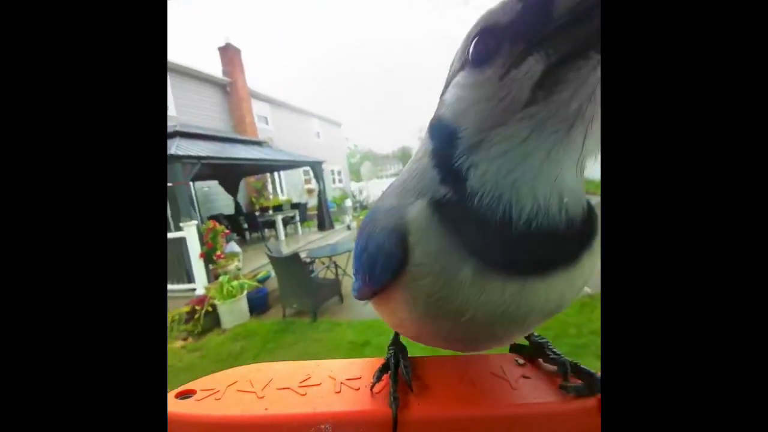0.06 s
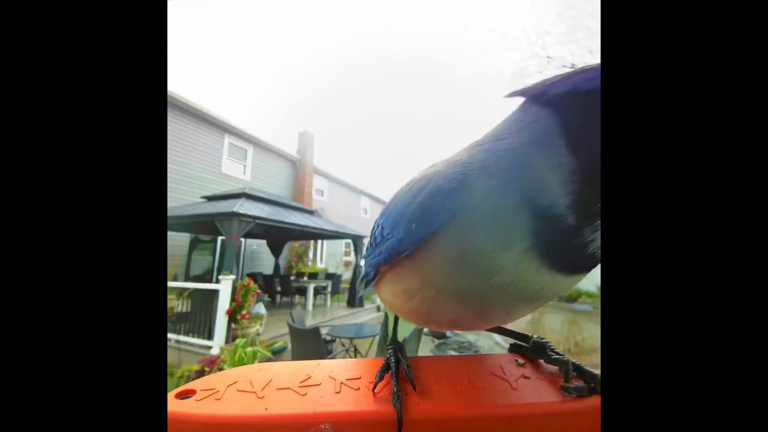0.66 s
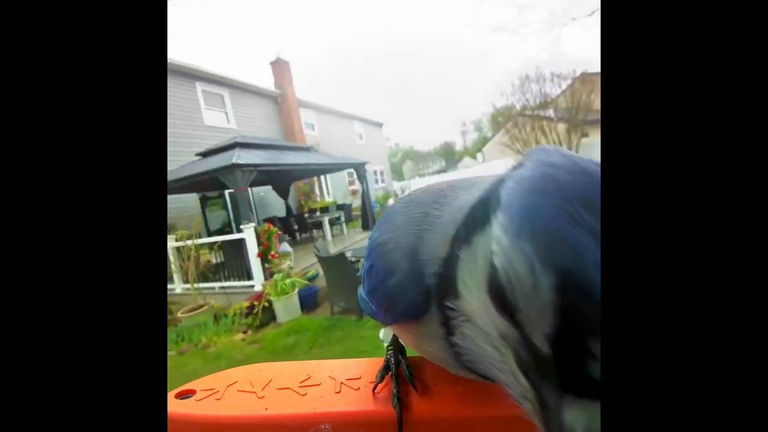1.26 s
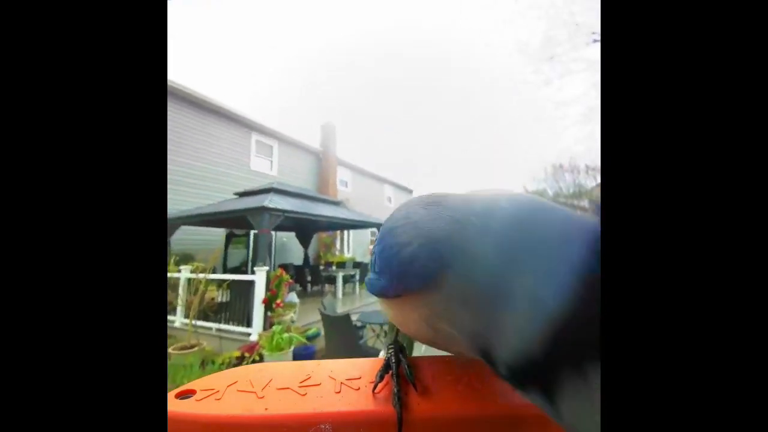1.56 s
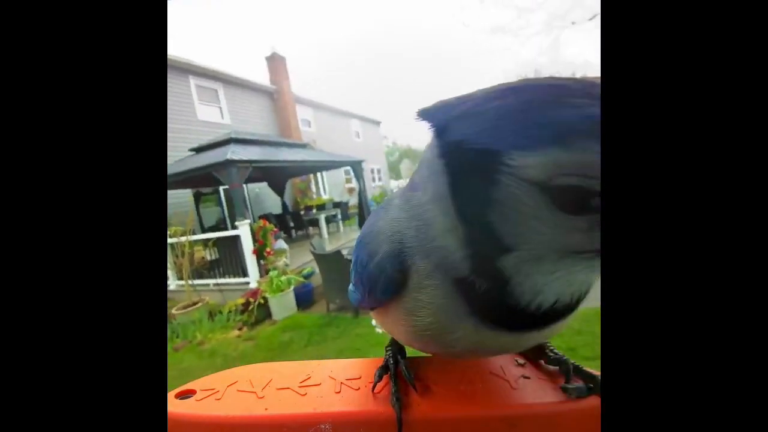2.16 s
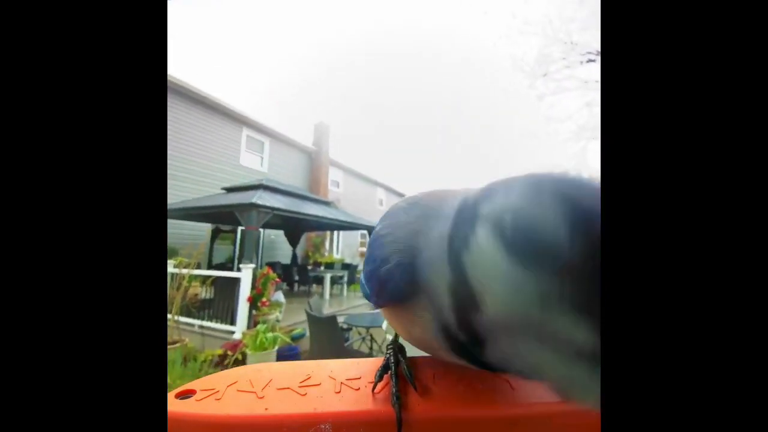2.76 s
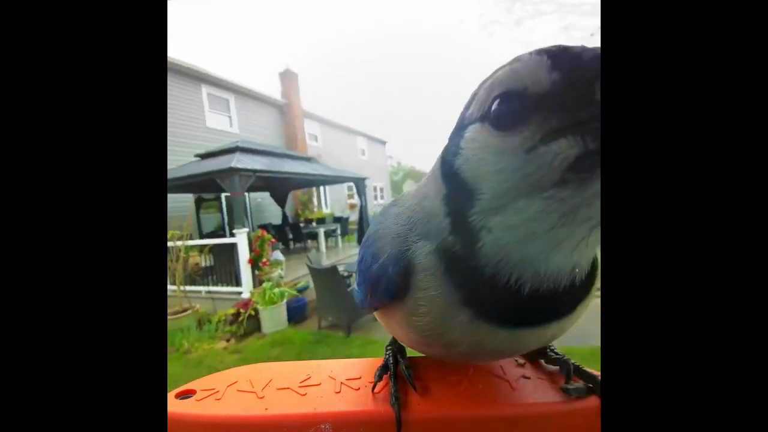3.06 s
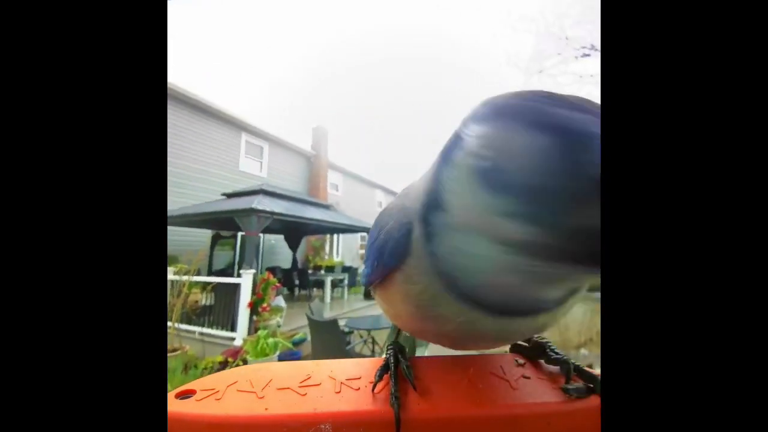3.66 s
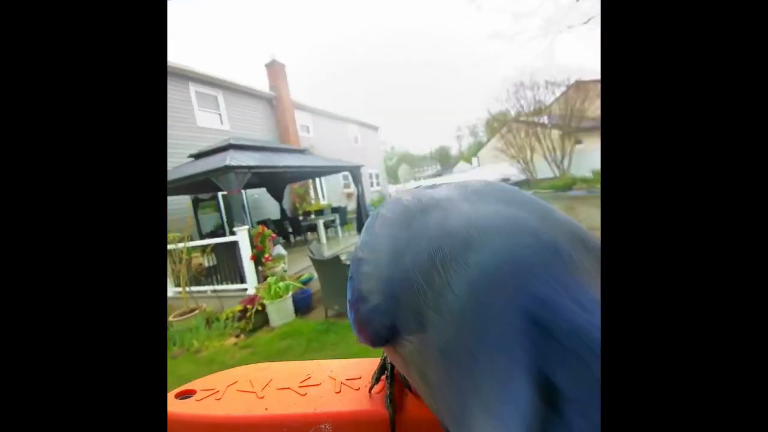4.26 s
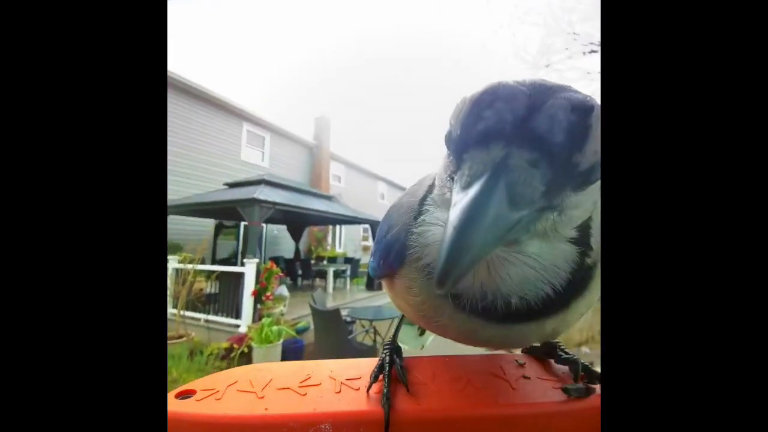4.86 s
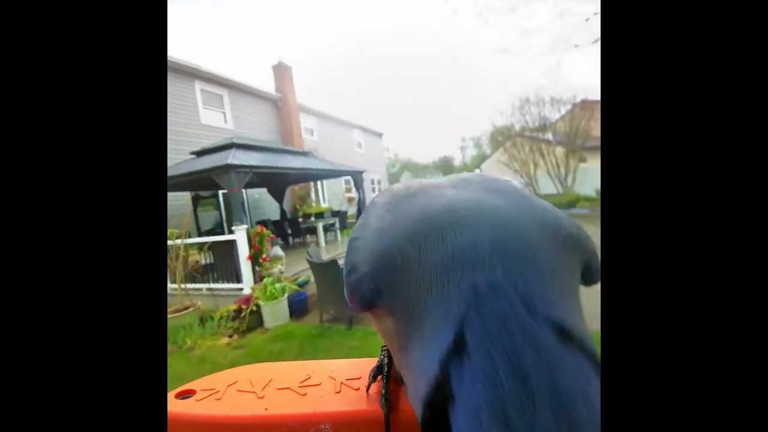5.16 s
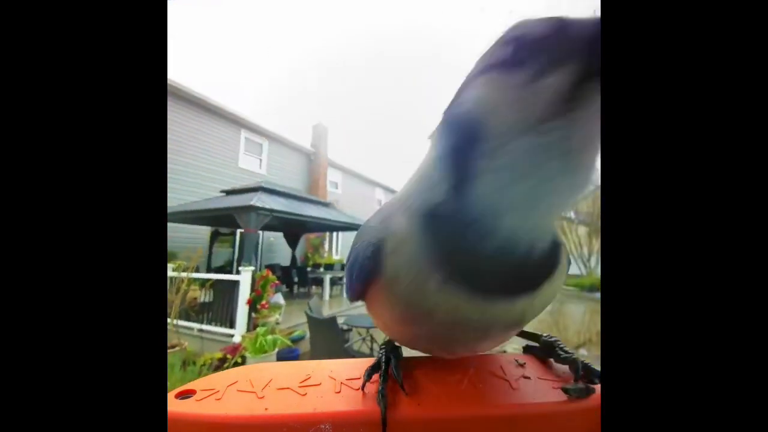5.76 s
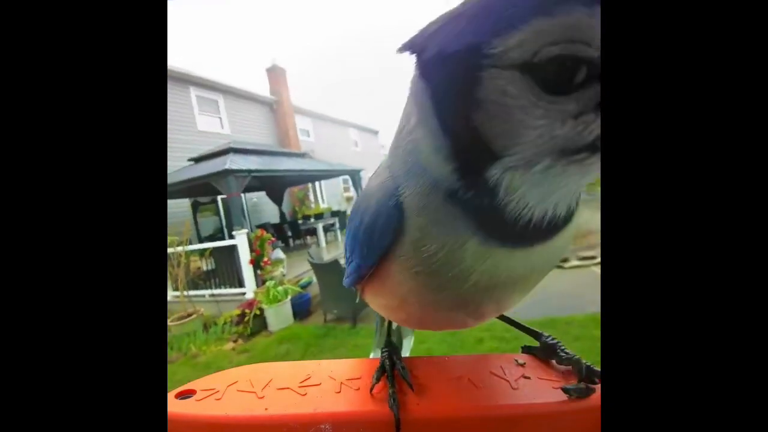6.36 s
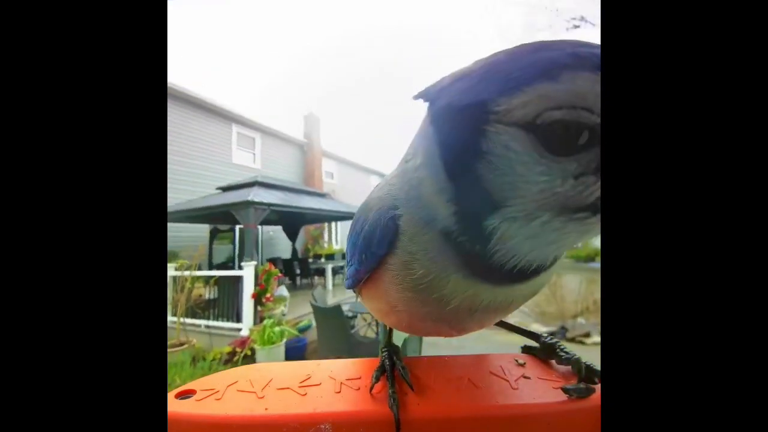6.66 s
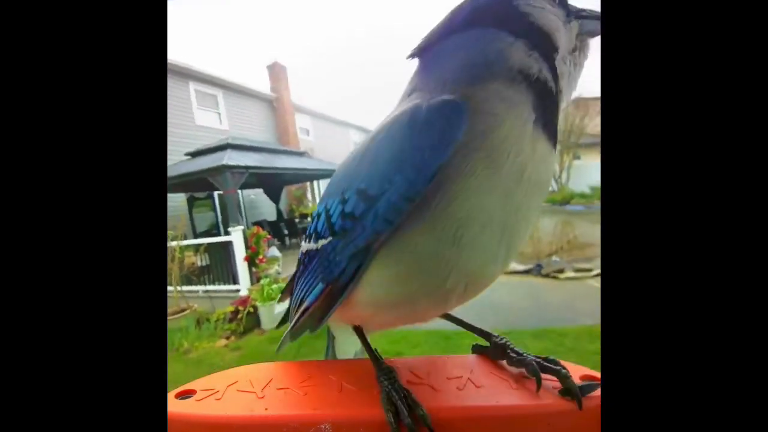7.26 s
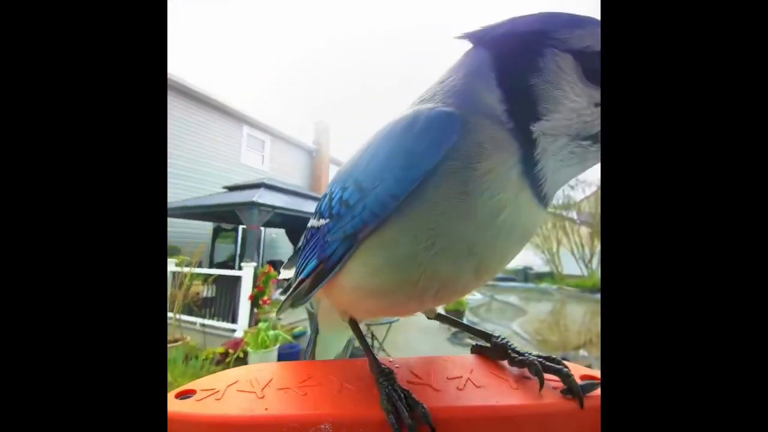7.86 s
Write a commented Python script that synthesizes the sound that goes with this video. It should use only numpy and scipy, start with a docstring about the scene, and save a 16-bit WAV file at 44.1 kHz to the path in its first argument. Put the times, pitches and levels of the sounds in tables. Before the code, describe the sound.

A small bird chatters harshly, then a jay's beak clicks and knocks on a hollow plastic feeder, very close, over soft outdoor hiss.

```python
"""A jay stands on a plastic feeder, right by its built-in microphone, whose port rings near 5 kHz.
For the first 0.7 s a small bird nearby scolds in a harsh, fast chatter, with a soft hissy wash under it.
Then the jay picks at the seed: its beak clicks, its pecks knock the hollow case, its claws scuff
and it hops once. Throughout, the yard echoes faintly and a thin hum swells and fades over soft hiss."""
import sys
import numpy as np
from scipy import signal
from scipy.fft import rfft, irfft
from scipy.io import wavfile
from scipy.ndimage import uniform_filter1d

SR = 44100
rng = np.random.default_rng(int(sys.argv[2]) if len(sys.argv) > 2 else 0)


def wav_record(signal):
    """Record a signal, one row per channel, as 16-bit PCM in the file named by sys.argv[1]."""
    frames = np.transpose(np.atleast_2d(signal))
    bounded = np.clip(frames, -1, 1)
    # unit amplitude maps onto the largest positive 16-bit level
    quanta = np.round(bounded * 32767).astype(np.int16)
    wavfile.write(sys.argv[1], SR, quanta)


N = 357651
TIME_S = np.arange(N) / SR
AGE_S = TIME_S[:int(.4 * SR)]  # time within one event
LIGHT_THUD_DB = -50

# chatter notes (time [s], top of pitch arch [Hz], second harmonic [dB], length [s])
NOTES = [(-0.012, 2370, -40, 0.025), (0.029, 2053, -37.5, 0.028), (0.075, 2204, -42, 0.033),
         (0.128, 2736, -33.5, 0.026), (0.179, 2660, -30, .024), (0.231, 2800, -28, .022),
         (0.281, 2670, -25.5, .024), (0.334, 2710, -27, .027), (0.395, 2606, -39.5, 0.03),
         (0.46, 2847, -39.5, .024), (0.52, 3100, -37, .026), (0.574, 2803, -32, 0.027),
         (0.624, 3100, -34.5, 0.032), (0.679, 3057, -35.5, 0.029)]
# rasp around the second harmonic (frequency [Hz], gain [dB])
RASP_HIGH = [(1000, -62), (3300, -36), (3900, -24.5), (4500, -11.5), (4850, -5.5), (5150, 4), (5500, -12.5),
             (5900, -19), (6800, -32.5), (10000, -48.5), (16000, -62.5)]
# rasp around the fundamental (frequency [Hz], gain [dB])
RASP_LOW = [(100, -23), (800, -15.5), (1550, -30), (1950, -10), (2500, -4.5), (3150, -11), (3600, -2.5),
            (5000, -8), (9000, -29)]
# broad hiss over the notes (frequency [Hz], gain [dB])
RASP_AIR = [(60, -13), (320, 4.5), (700, -7.5), (1000, 7.5), (1500, -13), (7000, -2), (10000, 3),
            (13000, -12), (16000, -25)]
# microphone port response (frequency [Hz], gain [dB])
PORT = [(1000, -52.5), (2200, -38.5), (3600, -29), (4400, -16), (4850, -5.5), (5150, -2.5), (5450, -3.5),
        (5900, -16.5), (6800, -30.5), (10000, -30), (16000, -42)]
# gritty noises (time [s], length [s], rumble [dB], hardness = hiss re rumble [dB])
# row at 0.05 s: soft hissy wash under the chatter; others: scuffs on the plastic
WASH_AND_SCUFFS = [(0.0, 0.028, -46.5, -6.5), (0.05, 0.44, -64.5, 11), (4.27, 0.1, -56, -18),
                   (4.33, 0.49, -68.5, -9), (5.158, 0.047, -47, -10), (5.728, 0.21, -60, -22),
                   (5.92, 0.21, -66, -17), (7.081, 0.056, -51, -13.5), (7.129, 0.125, -50, -4),
                   (7.24, 0.21, -63.5, -11), (7.76, 0.45, -74, -19.5)]
# hollow plastic case (frequency [Hz], gain [dB], t60 [s])
CASE_MODES = [(72, -40, 0.27), (95, -36.5, 0.12), (166, -27.5, 0.22), (194.6, -26.5, .24),
              (275.6, -20.5, 0.12), (300.5, -39, .07), (406, -19.5, 0.16), (483.7, -3.5, 0.099),
              (514.9, 3, 0.048), (567.3, -1.5, 0.045), (625.7, -10.5, 0.075), (706, -12, 0.061),
              (789, -12.5, 0.042), (844, -9.5, 0.034), (980.4, -22, 0.025), (1262, -24, 0.067),
              (1474, -11.5, 0.021), (1594, -14.5, 0.069), (1680, -10, .035), (1857, -8.5, 0.031),
              (2070, -15, 0.012), (2573, -10, 0.038), (2710, -20.5, 0.024), (2944, -12, 0.02),
              (4050, -23, 0.011)]
# beak at seed and tray (time [s], first click [dB], catches [count])
NIBBLES = [(0.167, -29.5, 2), (1.048, -39, 2), (1.561, -35.5, 2), (1.641, -43.5, 1), (1.796, -35, 2),
           (1.892, -38, 4), (2.633, -34.5, 1), (2.7635, -29, 2), (2.885, -32.5, 3), (4.457, -42.5, 2),
           (4.619, -35.5, 2), (5.195, -35, 1), (5.417, -35, 1), (5.433, -34.5, 1), (5.614, -35, 2),
           (6.0117, -46, 1), (7.2338, -27, 1), (7.3126, -41, 1), (7.336, -42, 1)]
# dull part of a click (frequency [Hz], gain [dB])
DULL = [(100, -32), (700, -20), (1500, -20.5), (2000, -9.5), (2600, -7.5), (3150, -4.5), (3700, -7.5),
        (5000, -20.5), (9000, -39.5)]
# bright edge of a contact (frequency [Hz], gain [dB])
EDGE = [(1000, -40), (4000, 11), (7000, -12), (15000, 18)]
# beak and foot blows (time [s], thud [dB], hardness = snap re thud [dB], tray gain [dB])
KNOCKS = [(1.052, -61, 2, -60), (1.566, -52.5, -5, -63), (2.623, -48.5, -10, -50.5),
          (3.168, -69, -11, -87.5), (3.77, -58, -9.5, -72), (4.284, -47.5, -27.5, -84),
          (4.303, -46, -11.5, -61), (5.173, -26, -18, -59), (5.424, -31.5, -6.5, -57),
          (5.756, -55.5, -13, -65.5), (5.835, -51, -12.5, -72), (5.853, -51, -16, -85),
          (7.145, -30, -8.5, -51), (7.215, -29, -23, -57), (7.316, -51, 2, -64), (7.349, -50, -24.5, -79),
          (7.476, -61.5, -3.5, -72)]
# pitchless crack of the plastic (frequency [Hz], gain [dB])
CRACK = [(40, -5), (200, 3.5), (900, 10.5), (1800, 11), (3500, 1), (6500, 0), (9000, -16), (15000, -21)]
# seed tray mode clusters (centre [Hz], gain [dB], t60 [s])
TRAY_MODES = [(1550, 1, 0.18), (2530, -8, 0.073), (3100, -8.5, 0.15), (3950, -19.5, 0.17), (4840, 5, 0.081),
              (5400, -7.5, 0.41)]
# hum envelope (time [s], level before trim [dB])
HUM_ENVELOPE = [(0.0, -62), (0.36, -61), (0.42, -68.6), (0.75, -82.5), (1.17, -66.5), (1.5, -59.5),
                (1.86, -82.5), (2.31, -96), (2.85, -74.5), (3.75, -86.5), (3.96, -72.4), (4.38, -70),
                (4.5, -57.5), (4.92, -64), (5.64, -81.5), (6.12, -62), (6.27, -77), (6.45, -62),
                (6.51, -61), (6.63, -82), (6.84, -72.7), (7.62, -85.2), (7.83, -65.5), (8.1, -59.5)]
# outdoor air and microphone hiss (frequency [Hz], gain [dB])
AIR = [(18, -78), (30, -57.5), (49, -30.5), (164, -16.5), (213, -14), (324, -15), (432, -10), (467, -9),
       (505, -9), (561, -11), (709, -12.5), (1170, -18), (10500, -19.5), (15500, -23.5)]
# yard echo colour (frequency [Hz], gain [dB])
YARD = [(80, -7), (250, -11.5), (500, -25), (1000, -14.5), (2500, -12.5), (4200, -9.5), (5150, -18),
        (6200, -11), (8000, -7), (15000, -32.5)]


def undb(db):
    """Decibels to gain."""
    return 10 ** (np.asarray(db) / 20)


def unit(x):
    """Scale to unit energy."""
    return x / np.linalg.norm(x)


def level(x, db, span_s):
    """Scale so the energy, spread over span_s, has this level."""
    return unit(x) * undb(db) * np.sqrt(span_s * SR)


def add(out, start_s, sound):
    """Mix a sound into a track."""
    i = max(int(start_s * SR), 0)
    out[i:i + len(sound)] += sound[:max(len(out) - i, 0)]


def colour(x, response, size=4096):
    """Minimum-phase filter from (frequency [Hz], gain [dB]) rows."""
    hz, db = np.transpose(response)
    grid_hz = np.maximum(np.fft.rfftfreq(size, 1 / SR), 1)
    gain = undb(np.interp(np.log(grid_hz), np.log(hz), db))
    cepstrum = irfft(np.log(gain))
    cepstrum[1:size // 2] *= 2
    cepstrum[size // 2 + 1:] = 0
    return signal.fftconvolve(x, irfft(np.exp(rfft(cepstrum))))[:len(x)]


def chatter(arch=.22, flutter_hz=160, flutter_depth=.6, wobble=.056, jitter=.045, air_db=-32):
    """Short pitch arches with a strong second harmonic, made harsh by fast flutter in the syrinx."""
    out = np.zeros(N)
    for time_s, top_hz, high_db, length_s in NOTES:
        # fundamental grows with loudness and pitch
        low_db = -47.5 + .22 * (high_db + 34) + 17 * np.log2(top_hz / 2700)
        start_s = max(time_s - length_s, 0)
        progress = (start_s + AGE_S - time_s) / length_s
        from_top = np.clip((progress - .4) * 2, -3, 3)
        swell = np.exp(-np.abs(from_top / np.where(from_top < 0, .58, .95)) ** 1.73)
        rate_hz = flutter_hz * (1 + .11 * rng.standard_normal())
        flutter = np.cos(np.pi * rate_hz * from_top * length_s)
        pitch_noise, high_noise, low_noise, air_noise = rng.standard_normal((4, len(AGE_S)))
        tremor = 6 * uniform_filter1d(pitch_noise, size=36)
        hz = top_hz * (1 - arch * np.minimum(from_top ** 2, 1.2) + wobble * flutter + jitter * tremor)
        phase = 2 * np.pi * np.cumsum(hz) / SR
        push = swell * (1 + flutter_depth * flutter)
        breath = np.sqrt(swell) * (1 + flutter_depth * flutter / 2)
        # second harmonic sweeps through the port resonance
        harmonic = unit(colour(push * np.sin(2 * phase), PORT))
        upper = harmonic + unit(colour(push * high_noise, RASP_HIGH))
        clarity = min((top_hz / 3100) ** 6, 1.3)  # low notes are hoarse
        lower = clarity * unit(push * np.sin(phase)) + .98 * unit(colour(breath * low_noise, RASP_LOW))
        hiss = undb(air_db) * unit(colour(breath * air_noise, RASP_AIR))
        note = undb(high_db) * (unit(upper) + hiss) + undb(low_db) * unit(lower)
        add(out, start_s, note * np.sqrt(length_s * SR))
    return out


def grit(samples, rate_hz=1200, spread_db=3.5):
    """Tiny impulses of uneven size at random times."""
    hits = rng.random(samples) < rate_hz / SR
    noise, size = rng.standard_normal((2, samples))
    return hits * np.sign(noise) * undb(spread_db * size) + 1e-4 * noise


def case(force, scatter_db=.5, detuning=.00656, sway_below_hz=350, walls_above_hz=1100):
    """Slow sway, hollow body and thin walls rung by a force; each spot has its own mix of modes."""
    hz, db, t60_s = np.transpose(CASE_MODES)[:, :, None]
    weight, detune, phase = rng.standard_normal((3, len(CASE_MODES), 1))
    decay = undb(db - scatter_db * weight - 60 * AGE_S / t60_s)
    modes = decay * np.sin(2 * np.pi * hz * (1 + detuning * detune) * AGE_S + phase / 2)
    group = np.digitize(hz[:, 0], [sway_below_hz, walls_above_hz])
    sway, body, walls = (modes[group == k].sum(0) for k in range(3))
    # body takes a few ms to move and radiates little below its modes
    body_rise = 1 - np.exp(-(AGE_S / .0032) ** 2)
    wall_rise = 1 - np.exp(-AGE_S / .000396)
    highpass = signal.butter(2, sway_below_hz, "high", fs=SR, output="sos")
    rings = sway * body_rise, signal.sosfilt(highpass, body * body_rise), walls * wall_rise
    return [signal.fftconvolve(force, ring)[:len(force)] for ring in rings]


def wall_level_db(thud_db, hardness_db):
    """Thin walls clack more under harder, stronger contact."""
    return thud_db - 7 + .62 * hardness_db + .13 * (thud_db - LIGHT_THUD_DB)


def wash_and_scuffs(sway_re_rumble_db=-19):
    """A soft hissy wash lies under the chatter; later, grit rings case and port as claws slip on plastic."""
    out = np.zeros(N)
    age_s = TIME_S[:SR // 2]
    for time_s, length_s, rumble_db, hardness_db in WASH_AND_SCUFFS:
        progress = np.minimum(age_s / length_s, 1)
        envelope = np.sqrt(np.maximum(np.sin(np.pi * progress), 0))
        force = envelope * grit(len(age_s))
        sway, body, walls = case(force)
        parts = [(sway, rumble_db + sway_re_rumble_db), (body, rumble_db),
                 (walls, wall_level_db(rumble_db, hardness_db)),
                 (colour(force, PORT), rumble_db + hardness_db)]
        add(out, time_s, sum(level(part, db, length_s) for part, db in parts))
    return out


def click(db, width_s=.001574, graze=.08, graze_s=.01194):
    """Tiny beak scrape: rings the port, too light to move the case."""
    lag_s = AGE_S - .012
    envelope = np.exp(-(lag_s / width_s) ** 2) + graze * np.exp(-np.abs(lag_s) / graze_s)
    force = rng.standard_normal(len(AGE_S)) * envelope
    ring = level(colour(force, PORT), db, span_s=.000513)
    dull = level(colour(force, DULL), db - 15.5, span_s=.0013)
    edge = level(colour(force, EDGE), db - 32, span_s=.00078)
    return ring + dull + edge


def nibbles(gap_s=.005, step_db=-2.36, unevenness=.08):
    """The beak slips and catches: quick runs of weakening clicks."""
    out = np.zeros(N)
    for time_s, first_db, catches in NIBBLES:
        for k in range(round(catches)):
            delay_s = k * gap_s * (1 + unevenness * rng.standard_normal())
            add(out, time_s + delay_s - .0105, click(first_db + k * step_db))
    return out


def lead_in(db, build_s=.006):
    """A brief dry noise swelling into each knock."""
    noise = rng.standard_normal(len(AGE_S)) * np.exp(-AGE_S[::-1] / build_s)
    return level(colour(noise, CRACK), db, build_s)


def contact(decay_s, rattle, rise_s=.000904):
    """Beak or claw bites in, pushes once and rattles briefly."""
    noise = rng.standard_normal(len(AGE_S))
    rise = 1 - np.exp(-(AGE_S / rise_s) ** 2)
    force = rattle * unit(noise * rise * np.exp(-AGE_S / decay_s))
    force[int(rise_s * SR)] += 1
    return force


def rebound(force, delay_s=.012, gain_db=-15):
    """A push plus its lighter second landing."""
    return force + undb(gain_db) * np.interp(AGE_S - delay_s, AGE_S, force, left=0)


def tray(spread=.03, count=12, scatter_db=2):
    """Tight clusters of high modes beat as they fade."""
    out = 0
    for hz, db, t60_s in TRAY_MODES:
        detune, phase = rng.standard_normal((2, count, 1))
        modes = np.sin(2 * np.pi * (hz * (1 + spread * detune) * AGE_S + phase))
        decay = undb(db + scatter_db * rng.standard_normal() - 60 * AGE_S / t60_s)
        out = out + decay * modes.sum(0) / np.sqrt(count)
    return out


def knocks():
    """Each blow snaps, clacks the walls, thuds the body, rocks the feeder and rings the tray."""
    out = np.zeros(N)
    for time_s, thud_db, hardness_db, tray_db in KNOCKS:
        snap_db = thud_db + hardness_db
        clack_db = wall_level_db(thud_db, hardness_db)
        sway_db = -70 + .76 * (thud_db - LIGHT_THUD_DB)
        sway, body, walls = case(contact(decay_s=.005, rattle=.45))
        snap = colour(rebound(contact(decay_s=.0016, rattle=10)), PORT)
        crack = colour(rebound(contact(decay_s=.013, rattle=1.7)), CRACK)
        edge = colour(rebound(contact(decay_s=.002, rattle=1.5)), EDGE)
        shell = level(sway, sway_db, .04) + level(body, thud_db, .02) + level(walls, clack_db, .01)
        bite = level(snap, snap_db, .01) + level(edge, snap_db - 13, .003)
        bite += level(crack, clack_db - 3, .02)
        add(out, time_s - .001, shell + bite + undb(tray_db) * tray())
        add(out, time_s - AGE_S[-1], lead_in(clack_db - 4))
    return out


def yard(x, t60_s=.67, build_s=.0021):
    """House walls and fences return a faint, diffuse echo."""
    age_s = TIME_S[:SR]
    envelope = undb(-60 * age_s / t60_s) * (1 - np.exp(-age_s / build_s))
    impulse_response = unit(rng.standard_normal(SR) * envelope)
    return colour(signal.fftconvolve(x, impulse_response)[:N], YARD)


def hum(start_hz=486.2, sag_hz_per_s=1.45, trim_db=.5):
    """One thin tone swells, fades and sags in pitch."""
    hz = start_hz - sag_hz_per_s * TIME_S
    rms_db = trim_db + np.interp(TIME_S, *np.transpose(HUM_ENVELOPE))
    return np.sqrt(2) * undb(rms_db) * np.sin(2 * np.pi * np.cumsum(hz) / SR)


def air(rms_db=-68):
    """Steady outdoor air and microphone hiss."""
    return level(colour(rng.standard_normal(N), AIR), rms_db, N / SR)


def scene(chatter_send_db=-3, click_send_db=5, shell_send_db=1):
    """Both birds and their echo, over hum and air."""
    call, clicks, shell = chatter(), nibbles(), knocks() + wash_and_scuffs()
    echo = yard(undb(chatter_send_db) * call + undb(click_send_db) * clicks + undb(shell_send_db) * shell)
    return (call + clicks + shell + echo + hum() + air())[None]


def record(dry, cutoff_hz=15800):
    """The small camera cuts the top treble."""
    return signal.sosfilt(signal.ellip(10, .2, 70, cutoff_hz, fs=SR, output="sos"), dry)


dry = scene()
out = record(dry)
wav_record(out)
```